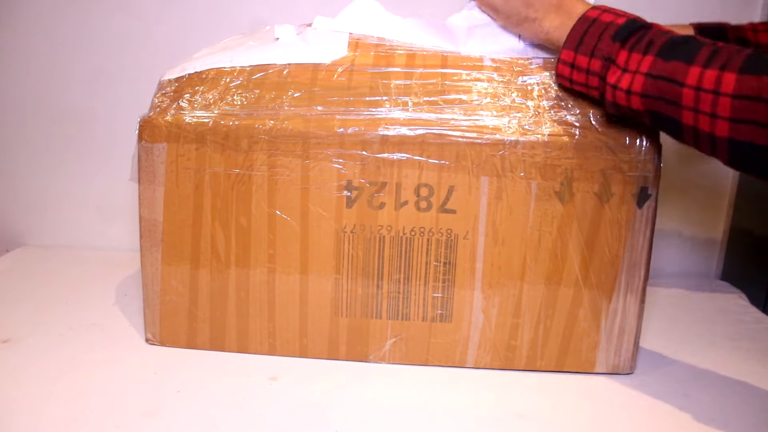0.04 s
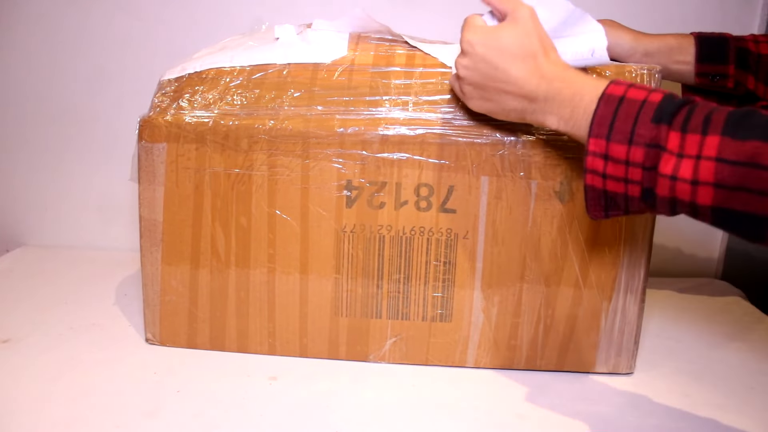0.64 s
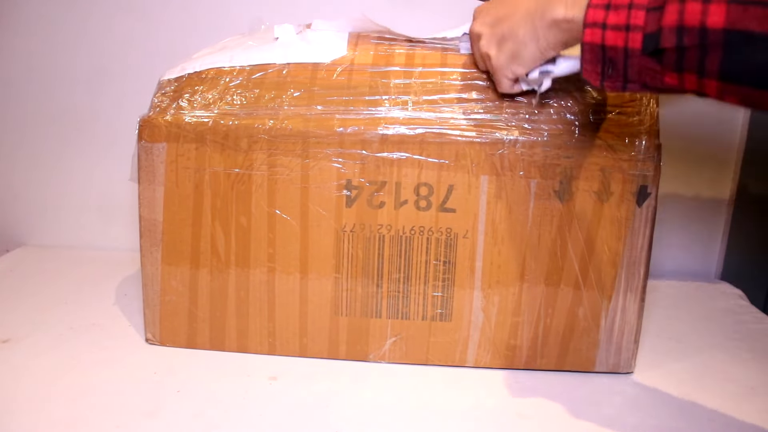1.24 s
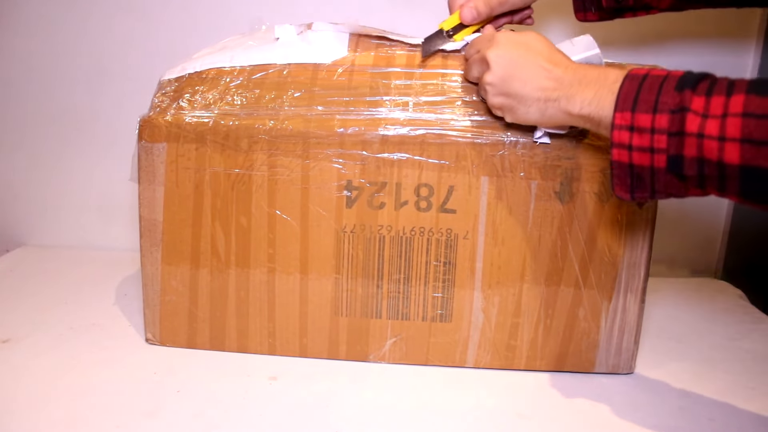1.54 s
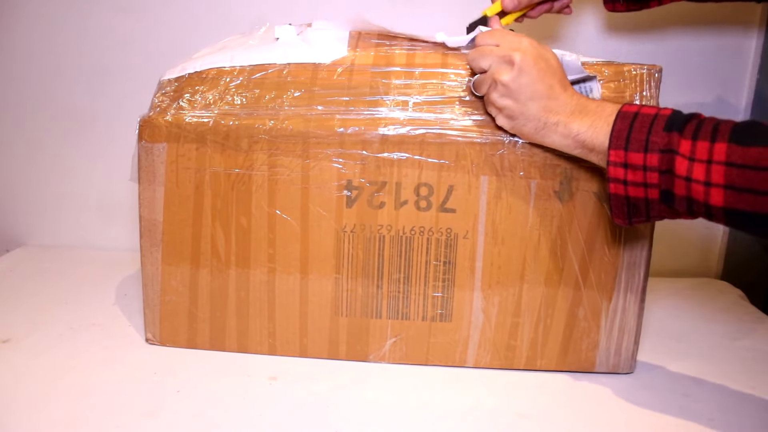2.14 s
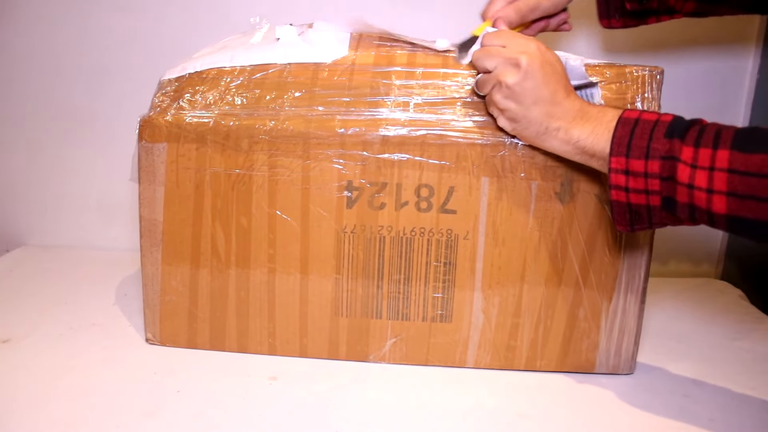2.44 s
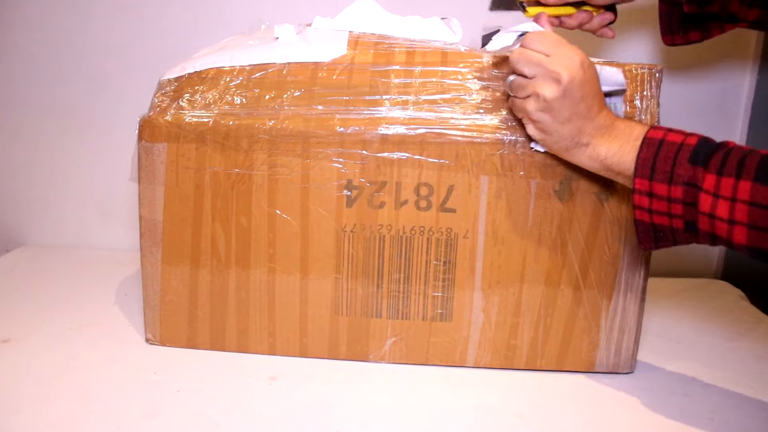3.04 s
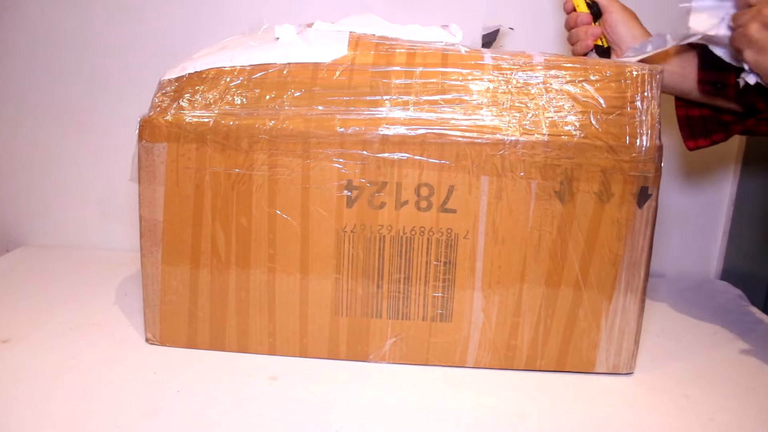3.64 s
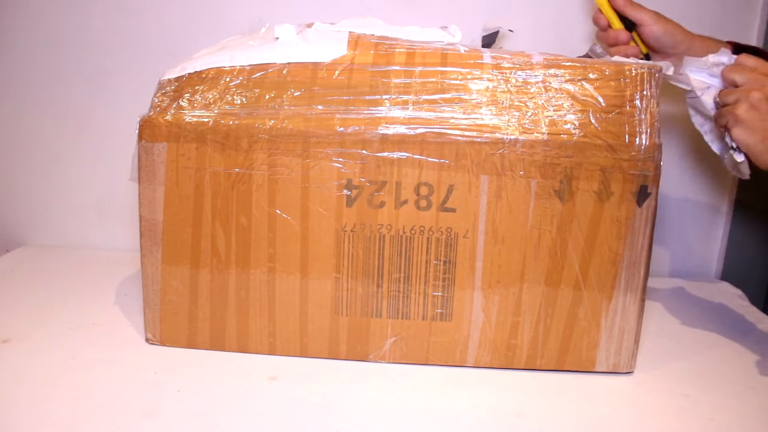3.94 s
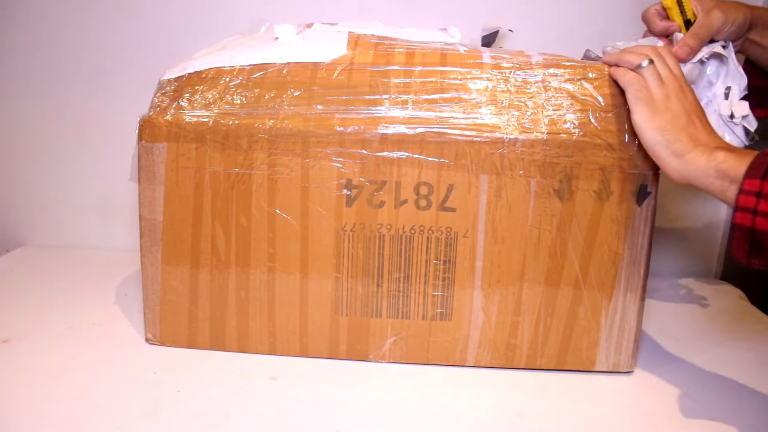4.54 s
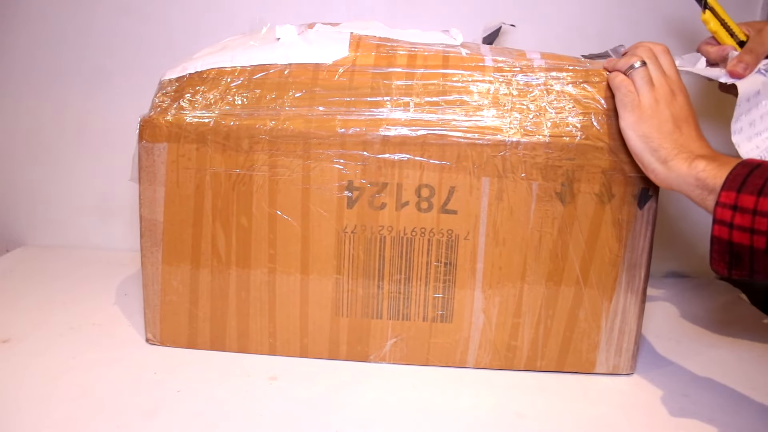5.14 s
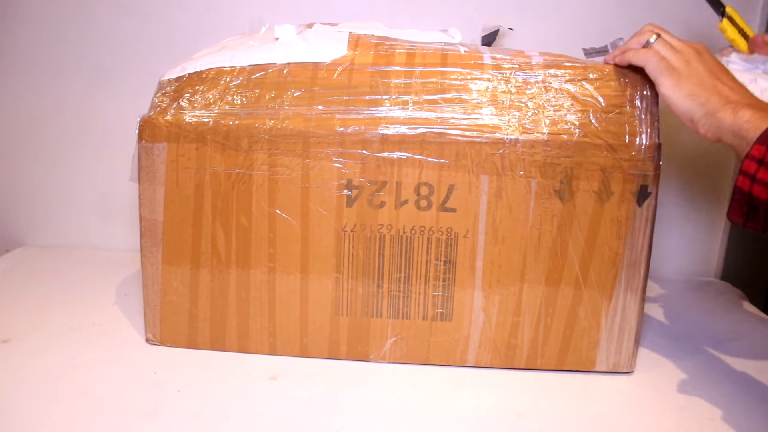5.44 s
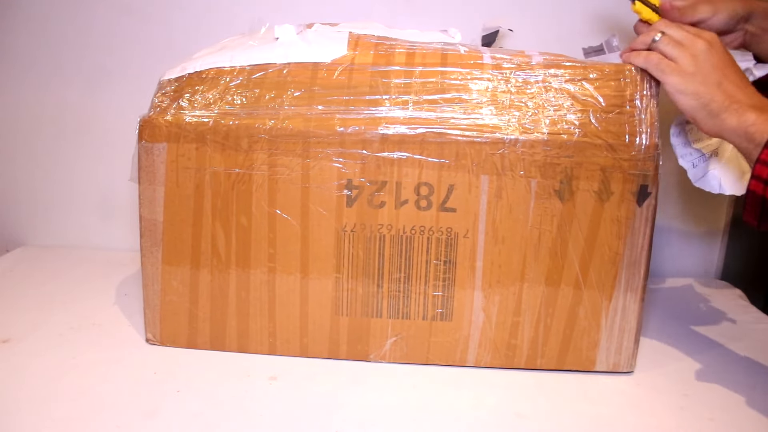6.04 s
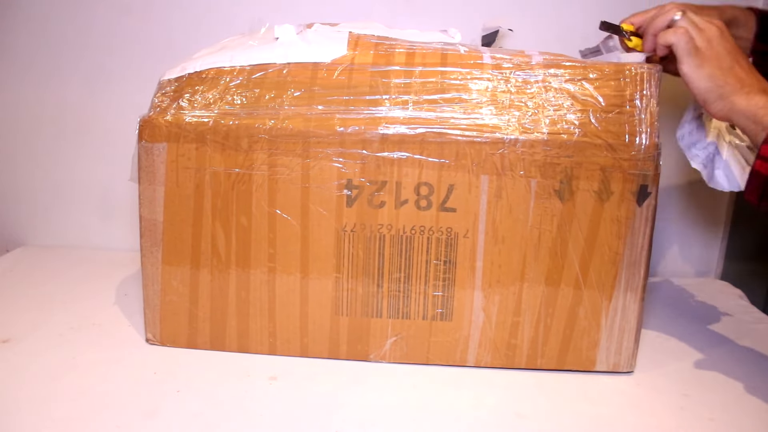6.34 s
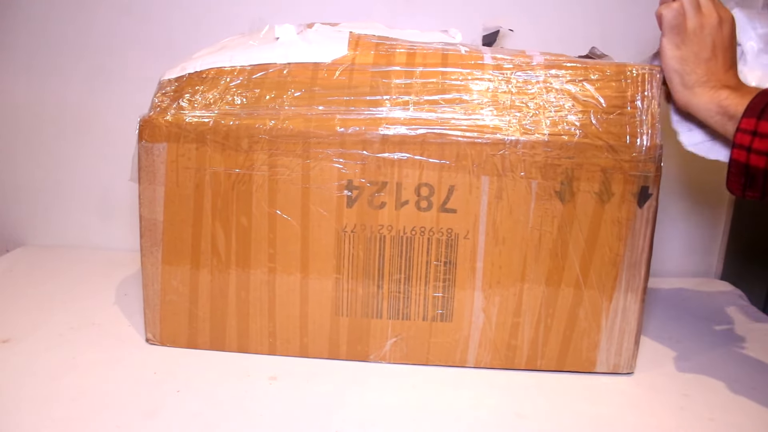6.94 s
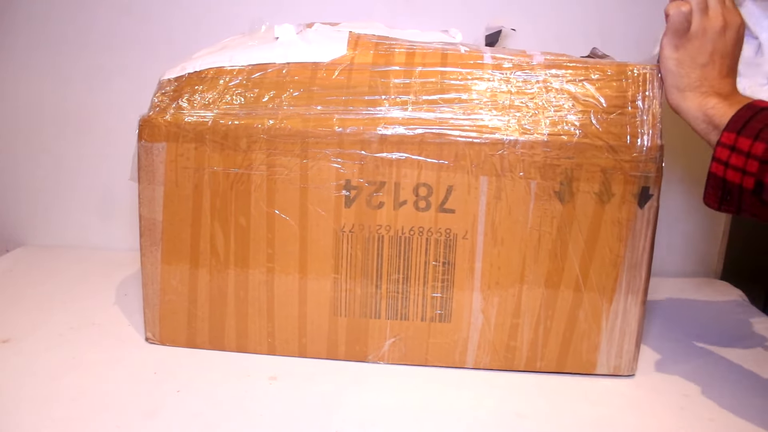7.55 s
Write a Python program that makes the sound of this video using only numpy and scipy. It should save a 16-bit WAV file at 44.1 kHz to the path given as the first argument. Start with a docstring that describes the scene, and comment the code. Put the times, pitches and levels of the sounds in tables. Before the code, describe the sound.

Plastic wrap crackles and snaps as hands pull and cut it off a cardboard box, with hollow bumps and a short tape rip.

```python
"""In a small room, hands pull paper and stretch wrap off a taped cardboard box and work at it with a knife.
Stick-slip friction makes the film crackle under each pull; creases buckle with a snap and tape rips loose.
The modes of the hollow box boom as it is rubbed, bump when it is jolted and colour the scuffs on its lid.
Two close microphone ports pick up the direct sound, a wall echo and a short reverberation."""
import sys
import numpy as np
from scipy import signal
from scipy.fft import rfft, irfft
from scipy.io import wavfile
from scipy.ndimage import uniform_filter1d, minimum_filter1d

SR = 44100
rng = np.random.default_rng(int(sys.argv[2]) if len(sys.argv) > 2 else 0)


def dump(signal):
    """Clip the signal to [-1, 1] and save it as 16-bit WAV at the path in sys.argv[1]."""
    limited = np.clip(np.atleast_2d(signal).T, -1, 1)
    pcm = np.round(limited * 32767).astype(np.int16)
    wavfile.write(sys.argv[1], SR, pcm)


N = 343098

# normal modes of the hollow box: (frequency [Hz], bandwidth [Hz], peak level [dB])
BOX_MODES = [(138.3, 15, 5.5), (200, 32, 2.5), (256, 160, 0), (390.4, 38, 8), (478, 35, 1), (810, 86, 0),
             (1223, 77, 7)]


def amp(db):
    """Decibels to amplitude ratio."""
    return 10 ** (np.asarray(db) / 20)


def unit_rms(x):
    """Normalisation to mean power 1."""
    return x / np.sqrt(np.mean(x ** 2) + 1e-20)


def unit_energy(x):
    """Normalisation to total energy 1."""
    return x / np.sqrt(np.sum(x ** 2) + 1e-20)


def bins(size=4096):
    """Frequencies of the discrete Fourier transform, in Hz."""
    return np.fft.rfftfreq(size, 1 / SR)


def curve(points, hz):
    """Interpolation of a table along log frequency."""
    f, value = np.transpose(points)
    return np.interp(np.log(hz + 1), np.log(f + 1), value)


def add(mix, start_s, sound):
    """Superposition: a sound joins the mix at its start time."""
    part = mix[max(round(start_s * SR), 0):][:len(sound)]
    part += sound[:len(part)]


def pulse(spectrum_db):
    """Minimum phase: the most compact causal pulse with this spectrum, at energy 1."""
    cepstrum = irfft(np.maximum(spectrum_db, spectrum_db.max() - 80) * np.log(10) / 20)
    half = len(cepstrum) // 2
    cepstrum[1:half] *= 2
    cepstrum[half + 1:] = 0
    return unit_energy(irfft(np.exp(rfft(cepstrum))))


def excite(force, response):
    """A linear system convolves its drive with its impulse response."""
    return signal.oaconvolve(force, response)[:N]


def hump(centre_hz, octaves, below_db, above_db):
    """Band-pass response in dB: a top rounded over `octaves`, flanks tending to slopes in dB an octave."""
    away = np.log2((bins() + 10) / centre_hz)
    return -(np.hypot(away, octaves) - octaves) * np.where(away < 0, below_db, above_db)


def resonances(modes, floor_db):
    """Modal summation: Lorentzian peaks add in power to a flat floor, giving a response in dB."""
    peaks = sum(amp(db) ** 2 / (1 + (2 * (bins() - hz) / width) ** 2) for hz, width, db in modes)
    return 10 * np.log10(amp(floor_db) ** 2 + peaks)


def band_rms(x, low_hz, high_hz):
    """Effective amplitude within a pass band."""
    band = signal.butter(2, [low_hz, high_hz], "band", fs=SR, output="sos")
    return np.std(signal.sosfilt(band, x))


def steadied(x, span_s):
    """Division by the running rms: a pull releases its energy evenly from span to span."""
    power = abs(uniform_filter1d(unit_rms(x) ** 2, int(span_s * SR)))
    return x / np.sqrt(power + 0.043)


def slips(per_s, spread_db):
    """Stick-slip friction as a Poisson train of kicks, most tiny and a few large."""
    size = amp(spread_db * np.minimum(rng.exponential(1, N), 4)) * rng.choice([-1, 1], N)
    return unit_rms(size * (rng.random(N) < per_s / SR))


def flurries(depth_db=3.5, span_s=0.018):
    """Random amplitude modulation: slips come in short flurries."""
    knots = np.arange(0, N / SR + span_s, span_s)
    gains = amp(depth_db * np.clip(rng.standard_normal(len(knots)), -2, 2))
    return np.interp(np.arange(N) / SR, knots, gains)


def room_noise(level_db=-60):
    """Quiet ambient noise, partly coherent because both ports share one component."""
    # noise spectrum of the room: (frequency [Hz], relative density [dB])
    spectrum = [(25, -19), (60, -5.5), (150, -4.5), (1000, -16.5), (16000, -24)]
    colour = pulse(curve(spectrum, bins()))
    left, right, both = (unit_rms(excite(rng.standard_normal(N), colour)) for _ in range(3))
    return amp(level_db) * unit_rms(np.array([left, right]) + 0.5 * both)


def diffuse_field(near_db, tail_db, size, near_t60_s=0.054, onset_s=0.0017):
    """Scatter round the box and reverberation decay exponentially; gives their spectrum at each port."""
    # decay of the room: (frequency [Hz], reverberation time T60 [s])
    decay = [(150, 0.13), (4000, 0.23), (16000, 0.15)]
    # likeness of the field at the two ports: (frequency [Hz], coherence [0..1])
    likeness = [(100, 0.96), (500, 0.78), (1200, 0.28), (5000, 0.14)]
    t = np.arange(size) / SR
    hz, when, noise = signal.stft(rng.standard_normal((2, size)), SR, nperseg=256)
    decaying = noise * amp(-60 * when / curve(decay, hz)[:, None])
    tail = signal.istft(decaying, SR, nperseg=256)[1][:, :size]
    near = rng.standard_normal((2, size)) * amp(-60 * t / near_t60_s)
    rise = 1 - np.exp(-(t / onset_s) ** 2)
    field = amp(tail_db) * unit_energy(tail * rise) + amp(near_db) * unit_energy(near * rise)
    shared, separate = rfft(np.sqrt(2) * field)
    coherence = curve(likeness, bins(size))
    return np.array([coherence * shared + np.sqrt(1 - coherence ** 2) * separate, shared])


def room(x, near_db, tail_db, echo_s=0.0055, echo_db=-11, size=16384, count=14):
    """Multipath propagation: direct sound, wall echo and scatter interfere anew as the hands move."""
    # level difference between the ports: (frequency [Hz], left minus right [dB])
    port_balance = [(400, 0.1), (2200, -3.5), (4000, -2), (9000, -3.5)]
    # the hands move to the right: (time [s], lag of the left port [samples])
    port_lag = [(0, 1.25), (2.8, 1.05), (4, 3.23), (7.8, 2.96)]
    hz, hop, fade = bins(size), 1800, 200
    scatter = [diffuse_field(near_db, tail_db, size) for _ in range(count)]
    balance = amp(np.array([[0.5], [-0.5]]) * curve(port_balance, hz))
    echoes = [amp(echo_db) * np.exp(-2j * np.pi * hz * delay_s) * hz / (hz + 350)
              for delay_s in echo_s * rng.uniform(0.62, 1.15, count)]
    window = np.convolve(np.ones(hop), np.ones(fade) / fade)
    x, out = np.pad(x, (fade, size)), np.zeros((2, N + 2 * size))
    for k, start in enumerate(range(0, N + fade, hop)):
        lag_s = np.interp(start / SR, *np.transpose(port_lag)) / SR
        direct = np.exp(-2j * np.pi * hz * np.array([[lag_s], [0]]))
        paths = balance * (direct * (1 + echoes[k % count]) + scatter[k % count])
        piece = rfft(x[start:start + len(window)] * window, size)
        out[:, start:start + size] += irfft(piece * paths / np.sqrt(np.mean(abs(paths) ** 2)))
    return out[:, fade:fade + N]


def taut_ring(start_s=5.5, length_s=0.7, level_db=-61, hz=1425, width_hz=25):
    """Forced resonance: slow slipping keeps one narrow mode of the taut wrap ringing faintly."""
    out, swell = np.zeros(N), np.sqrt(np.hanning(int(length_s * SR)))
    tone = signal.lfilter(*signal.iirpeak(hz, hz / width_hz, SR), rng.standard_normal(len(swell)))
    add(out, start_s, amp(level_db) * unit_rms(tone * swell))
    return out


def box_rub(level_db):
    """Friction of film and hands drives the modes of the box; now one booms and now another."""
    # spectrum of the rubbing: (frequency [Hz], relative density [dB])
    spectrum = [(25, -53), (55, 1.5), (100, -5.5), (135, 6), (420, 6), (650, 8.5), (3000, -54)]
    boom = np.zeros(N)
    for mode in BOX_MODES:
        colour = curve(spectrum, bins()) + resonances([mode], floor_db=-13)
        strength = flurries(depth_db=2.5, span_s=0.11) * np.linalg.norm(amp(colour))
        boom += strength * excite(slips(per_s=900, spread_db=4), pulse(colour))
    boom = steadied(boom, span_s=0.054)
    return amp(level_db) * boom / band_rms(boom, 100, 500)


def pressed_box(panel_db, detune=0.015):
    """Tension shifts resonances: the response of the box in dB, as the hands press it for one blow."""
    shifted_hz = bins() * np.exp(detune * rng.uniform(-1.54, 1))
    return np.interp(shifted_hz, bins(), resonances(BOX_MODES, panel_db))


def strike(response, contact_s, blow_db=-5):
    """Impact excitation: an impulse and an exponentially dying scrape drive a response, at energy 1."""
    t = np.arange(SR // 8) / SR
    force = unit_energy(rng.standard_normal(len(t)) * np.exp(-t / contact_s))
    force[0] += amp(blow_db)
    return unit_energy(signal.fftconvolve(force, response))


def radiated(x, cutoff_hz=110):
    """Radiation efficiency: the light panels give off little deep bass."""
    return signal.sosfilt(signal.butter(4, cutoff_hz, "high", fs=SR, output="sos"), x)


def lid_scuffs():
    """The point of contact weights the modes: blade and knuckles find a hollow pitch at each place."""
    # scuffs on the lid: (time [s], energy [dB], centre frequency [Hz])
    contacts = [(0.185, 3.5, 870), (.238, 2, 980), (.337, -5, 990), (0.7185, -1, 900), (1.121, 4.5, 1300),
                (1.619, -2.5, 1090), (1.872, -1.5, 1140), (2.6407, 2, 1240), (2.8459, 6.5, 1170),
                (2.8827, 11.5, 1300), (3.019, 4, 1440), (5.4816, 3.5, 1010), (6.2058, -4, 786),
                (6.669, -0.5, 1000), (7.428, -5.5, 700)]
    out = np.zeros(N)
    for s, db, hz in contacts:
        tock = pulse(pressed_box(panel_db=-3.5) + hump(hz, octaves=0.33, below_db=14, above_db=11))
        add(out, s, amp(db) * strike(tock, contact_s=0.0053))
    return out


def box_jolts():
    """Free vibration: the box rings on after each blow."""
    # blows on the box: (time [s], energy [dB], centre frequency [Hz], decay time of the contact [s])
    blows = [(.095, 0.5, 268, 0.02), (0.566, -8, 290, 0.062), (0.609, -3.5, 300, 0.0096),
             (1.355, -3, 200, 0.066), (1.769, 3, 345, 0.021), (2.106, 8, 527, 0.0083),
             (2.51, 3.5, 316, 0.014), (4.581, -10, 165, 0.032), (5.04, -0.5, 650, 0.013),
             (5.999, -13, 320, 0.0042), (6.099, -10.5, 480, .008), (6.649, 0.5, 395, 0.0072),
             (6.699, 16, 900, 0.0098), (6.704, 2, 110, 0.013), (7.167, 1, 487, 0.012),
             (7.246, -2.5, 385, 0.0052), (7.287, 4, 1015, 0.023), (7.57, 13, 660, 0.0049)]
    out = np.zeros(N)
    for s, db, hz, contact_s in blows:
        softness = np.clip(450 / hz, 0.5, 1.7)  # a soft palm leaves out the treble
        band = hump(hz, octaves=0.24, below_db=9.0 * softness, above_db=6.3 * softness)
        knock = pulse(pressed_box(panel_db=-4) + band)
        add(out, s, amp(db) * strike(knock, contact_s))
    return out


def rasps():
    """Quick stick-slip drives the resonance of a patch of wrapping, swelling fast and dying slowly."""
    # drags of blade and paper: (time [s], duration [s], level [dB], centre frequency [Hz])
    drags = [(0.146, 0.073, -26.5, 930), (1.119, 0.1, -31, 1370), (2.409, 0.024, -23.5, 12000),
             (2.925, 0.14, -34, 1320), (3.461, 0.11, -21.5, 2750), (3.447, 0.29, -34.5, 12000),
             (3.584, 0.016, -22, 3080)]
    out = np.zeros(N)
    for s, length_s, db, hz in drags:
        progress = np.linspace(0, 1, int(length_s * SR))
        envelope = progress ** 0.044 * (1 - progress)
        patch = pulse(hump(hz, octaves=0.49, below_db=30, above_db=30))
        drag = excite(slips(per_s=1500, spread_db=4), patch)
        add(out, s, amp(db) * unit_rms(drag[:len(envelope)] * envelope))
    return out


def avalanche(length_s, draw_pulse, follow_gain, count=5):
    """Chain reaction: one release sets off a run of others, each drawn by draw_pulse()."""
    burst = np.zeros(SR // 8)
    add(burst, 0, draw_pulse())
    for k, (wait, size) in enumerate(rng.random((count, 2))):
        add(burst, (k + wait) / count * length_s, follow_gain * (0.5 + size) * draw_pulse())
    return unit_energy(burst)


def tape_rips():
    """Stick-slip peeling: tape jerks off the cardboard in runs of pops, all ringing one taut strip."""
    # response of the strip: (frequency [Hz], relative density [dB])
    spectrum = [(200, -18.5), (540, 3), (800, -1.5), (1230, 2.5), (2200, 0), (2850, 6), (4700, -0.5),
                (10000, 3), (16000, -11)]
    # jerks of the tape: (time [s], energy [dB], duration [s])
    rips = [(4.7455, 13.5, 0.008), (4.786, 1, 0.0047), (4.8444, 5.5, 0.0061), (4.9021, 6, 0.0077),
            (4.9208, 12.5, .007), (4.9686, 10, 0.0061)]
    out, pop = np.zeros(N), pulse(curve(spectrum, bins()))
    for s, db, length_s in rips:
        add(out, s, amp(db) * avalanche(length_s, lambda: rng.choice([-1, 1]) * pop, follow_gain=0.68))
    return out


def bending_waves(x, travel_s=0.0002996, at_hz=8000):
    """Dispersion: higher bending waves cross the film faster; travel_s is the group delay at at_hz."""
    return excite(x, irfft(np.exp(-4j * np.pi * travel_s * np.sqrt(at_hz * bins()))))


def facet(centre_hz, ripple_db=3.0, knots=56):
    """Buckling: a facet of film flips in a pulse with chance resonances; large low ones ring longer."""
    log_hz = np.linspace(np.log(200), np.log(SR / 2), knots)
    ripple = np.interp(np.log(bins() + 1), log_hz, rng.standard_normal(knots))
    band_edges = -10 * np.log10((1 + (380 / (bins() + 1)) ** 6) * (1 + (bins() / 13000) ** 8))
    sharpness = np.clip(np.sqrt(4200 / centre_hz), 1, 1.7)
    peak = hump(centre_hz, 0.5 / sharpness ** 2, below_db=4.56 * sharpness, above_db=7.8 * sharpness)
    return pulse(peak + ripple_db * ripple + band_edges)


def crunches(length_s=0.0075):
    """Cascading buckling: wads of film and paper collapse one facet after another."""
    # wads giving way: (time [s], energy [dB], centre frequency [Hz])
    wads = [(0.1027, 9, 3730), (0.6118, -6, 2900), (.96, -5.5, 1880), (1.02, -11.5, 1800),
            (1.077, -7.5, 2960), (1.353, -0.5, 1800), (1.382, 2.5, 1920), (1.8687, 4.5, 3100),
            (1.877, 3.5, 2700), (1.932, -2, 4200), (1.985, -6, 2480), (2.0157, -11, 3900),
            (2.1188, 12, 7200), (2.2279, 9, 5180), (2.353, -6, 3880), (2.4132, 12.5, 4200),
            (2.543, 11, 6700), (2.6417, 5, 3400), (2.6596, 3.5, 5200), (2.842, 3.5, 3900),
            (3.0522, 3, 4850), (3.141, 11.5, 4000), (3.454, 8, 3300), (4.083, -11.5, 3340),
            (4.707, -3.5, 5500), (5.048, 2.5, 2750), (5.2575, -7, 1750), (5.395, -0.5, 4500),
            (5.587, -6.5, 2700), (5.639, 0, 2210), (5.8277, 1.5, 3860), (5.942, -3.5, 3400),
            (6.009, -5.5, 3220), (6.163, -5, 2580), (6.4419, 0, 2800), (6.52, 3.5, 6900),
            (6.6989, 10, 2070), (6.746, 7, 4440), (6.944, 4.5, 3000), (6.978, 9.5, 3200),
            (7.095, 2.5, 2640), (7.2615, 9, 6700), (7.288, 2, 2490), (7.5601, 5.5, 6000),
            (7.5711, 10, 2000), (7.64, 3.5, 3200)]
    out = np.zeros(N)
    for s, db, hz in wads:
        add(out, s, amp(db) * avalanche(length_s, lambda: facet(hz), follow_gain=0.46))
    return out


def snaps():
    """Snap-through: single creases of taut film let go, each with its own pitch."""
    # creases letting go: (time [s], energy [dB], centre frequency [Hz])
    creases = [(0.1802, 9, 4530), (0.188, 5, 3020), (0.2115, 11.5, 5300), (0.2743, 13, 7100),
               (0.397, 2.5, 2120), (.417, -7, 3400), (0.8761, 2.5, 3740), (1.12, 7.5, 3380),
               (1.4321, 6.5, 7500), (1.457, -8, 6000), (1.5244, 11, 5970), (1.638, 3.5, 4380),
               (1.7779, 5, 7000), (1.7845, 15.5, 7260), (2.101, 12, 5000), (2.1132, 16.5, 6100),
               (2.155, 1.5, 1900), (2.271, -4, 5000), (2.401, -6, 3500), (2.455, 12.5, 3200),
               (2.4565, 12, 4880), (2.512, 10.5, 3750), (2.76, -14, 3200), (3.091, 1, 5500),
               (3.108, 4, 6050), (3.115, -1, 5500), (3.1263, 8, 5330), (3.164, 9.5, 6740),
               (3.177, 13, 5900), (3.213, 8, 4900), (3.2836, 5, 6800), (3.3152, 9.5, 5450),
               (3.4429, 4, 4300), (3.8547, 1, 6620), (3.883, -5.5, 4970), (3.931, -3, 5480),
               (4.259, -6.5, 1980), (4.3742, 0, 7400), (5.14, -3.5, 8000), (5.423, 4, 8100),
               (5.893, -5.5, 3160), (7.2472, 0.5, 4180), (7.456, -5.5, 2200), (7.538, -2.5, 1850)]
    out = np.zeros(N)
    for s, db, hz in creases:
        add(out, s, amp(db) * facet(hz))
    return out


def pull_levels(depth_db=20, build_curve=1.89, release_curve=1.33):
    """Incoherent sources add in power: pulls over light handling give crackle, fizz and boom in dB."""
    # light handling between the pulls: (time [s], crackle level [dB])
    handling = [(0, -40.5), (.4, -44.5), (.55, -53), (.95, -40), (1.3, -45), (1.6, -45.5), (2.3, -48),
                (2.8, -52.5), (3.24, -38), (3.42, -52), (4.05, -58), (4.68, -45), (5.24, -48.5),
                (5.85, -41.5), (6.25, -43), (6.4, -48.5), (6.91, -50), (7.78, -41)]
    # pulls on the film, rising by depth_db in the build-up and falling as much in the release:
    # (time [s], build-up [s], release [s], crackle level [dB], fizz re crackle [dB], boom re crackle [dB])
    pulls = [(0, 0.00088, 0.029, -19, -41, -9), (0.064, 0.026, 0.027, -27, -5, -8.5),
             (.105, 0.068, 0.14, -26, -1, -11), (0.444, 0.021, 0.06, -39.5, 5, -19),
             (0.568, 0.15, 0.34, -35.5, 2.5, -28), (.75, 0.15, 0.02, -34, -0.5, -10),
             (1.07, 0.099, 0.12, -28, -3, -12.5), (1.301, 0.057, 0.21, -34.5, -5.5, -25.5),
             (1.539, 0.1, 0.16, -30, -3, -14.5), (1.66, 0.1, 0.12, -31, -3, -14.5),
             (1.964, 0.15, 0.022, -25, -1, -11), (2.139, 0.054, 0.064, -30, 0.5, -3),
             (2.39, 0.15, 0.19, -29, -1, -7), (2.605, 0.038, 0.062, -31, -12.5, -36),
             (2.821, 0.14, 0.17, -26, -5, -15.5), (3.052, 0.11, 0.026, -26, 0, -12),
             (3.3139, 0.0062, 0.053, -18, 2, -20), (3.433, 0.04, 0.32, -24.5, 0.5, -16),
             (3.53, 0.12, 0.11, -25.5, 2.5, -26), (3.791, 0.047, 0.03, -34.5, -3, -10),
             (4.071, 0.12, 0.043, -37, 1.5, -13), (4.208, 0.12, 0.18, -38.5, 6, -17),
             (4.716, 0.028, 0.076, -35, 8.5, -5), (4.897, 0.02, 0.12, -34, 6.5, -9),
             (5.02, 0.027, 0.042, -28.5, 0, -5.5), (5.288, 0.14, 0.13, -37.5, 5, -13),
             (5.579, 0.074, 0.069, -34, 0.5, -6.5), (6.422, 0.036, 0.048, -34, -1, -7.5),
             (6.51, 0.011, 0.51, -34.5, 4.5, -10.5), (6.648, 0.067, 0.084, -26.5, -4.5, -10),
             (6.942, 0.0056, 0.15, -22, 2.5, -6.5), (7.075, 0.044, 0.14, -28, -8, -7.5),
             (7.231, 0.0094, 0.28, -27.5, -1, -7.5), (7.419, 0.18, 0.12, -27.5, -5, -9.5)]
    t = np.arange(0, N / SR + 0.01, 0.001)
    handling_offsets_db = np.array([[0], [1], [-7.5]])  # crackle, fizz, boom
    power = amp(np.interp(t, *np.transpose(handling)) + handling_offsets_db) ** 2
    for start, build, release, db, fizz_db, boom_db in pulls:
        past_peak = t - start - build
        rising = abs(past_peak / build) ** build_curve  # exponents above 1 round the top
        falling = abs(past_peak / release) ** release_curve
        slack = np.minimum(np.where(past_peak < 0, rising, falling), 10)
        power += amp(db - depth_db * slack) ** 2 * amp([[0], [fizz_db], [boom_db]]) ** 2
    return [np.interp(np.arange(N) / SR, t, 10 * np.log10(p)) for p in power]


def crackle(level_db, fizz_db, slide_db=-5, split_hz=4600, count=20):
    """Shot noise of facets over smooth friction of paper on film; a harder pull sets off more ticks."""
    # spectrum of the crackling film: (frequency [Hz], relative density [dB])
    spectrum = [(60, -57), (450, -11.5), (750, 0.5), (1250, 3.5), (2600, 3.5), (4000, 1.5), (6000, -1),
                (9500, -2), (13000, -8.5), (16000, -16)]
    colour = curve(spectrum, bins())
    per_s = 80 * amp(0.6 * (np.clip(level_db, -55, -20) + 38.5))
    facets = np.array([facet(hz) * np.sqrt(hz) for hz in np.geomspace(700, 13000, count)])
    # facets of like size flurry together, so that each crinkle has its own colour
    grains = sum(flurries() * sum(excite(slips(per_s, spread_db=4.5), shape) for shape in patch)
                 for patch in np.array_split(facets, count // 2))
    facets_db = 10 * np.log10(np.sum(abs(rfft(facets)) ** 2, axis=0) + 1)
    ticks = steadied(excite(grains, pulse(colour - facets_db)), span_s=0.04)
    slide = excite(rng.standard_normal(N), pulse(colour))
    film = ticks + amp(slide_db) * slide
    body = signal.sosfiltfilt(signal.butter(2, split_hz, fs=SR, output="sos"), film)
    fizz = film - body  # the bright hiss of taut film
    body_gain = amp(level_db) / band_rms(film, 600, 4000)
    fizz_gain = amp(fizz_db) / band_rms(film, 5000, 15000)
    return body * body_gain + fizz * fizz_gain


def scene():
    """Superposition of film, tape and box in the room; the same pulls drive crackle and boom."""
    crackle_db, fizz_db, boom_db = pull_levels()
    rustle = room(crackle(crackle_db, fizz_db) + rasps(), near_db=2.5, tail_db=-4.0)
    cracks = room(bending_waves(snaps() + crunches() + tape_rips()), near_db=-8, tail_db=-10)
    box = room(box_rub(boom_db) + radiated(box_jolts() + lid_scuffs()), near_db=-4.5, tail_db=-6.5)
    return rustle + cracks + box + taut_ring() + room_noise()


def record(dry, hold_samples=15, cutoff_hz=15900):
    """Fast peak limiting holds the loudest snaps at full scale; a low-pass then limits the band."""
    gain = 1 / np.maximum(abs(dry).max(axis=0), 1)
    limited = dry * uniform_filter1d(minimum_filter1d(gain, hold_samples), hold_samples)
    low_pass = signal.firwin(401, cutoff_hz, window=("kaiser", 8), fs=SR)
    return signal.oaconvolve(limited, low_pass[None], "same")


dry = scene()
out = record(dry)
dump(out)
```